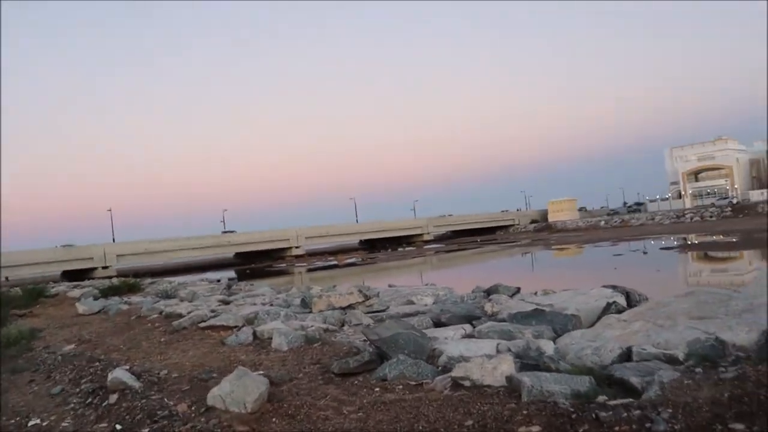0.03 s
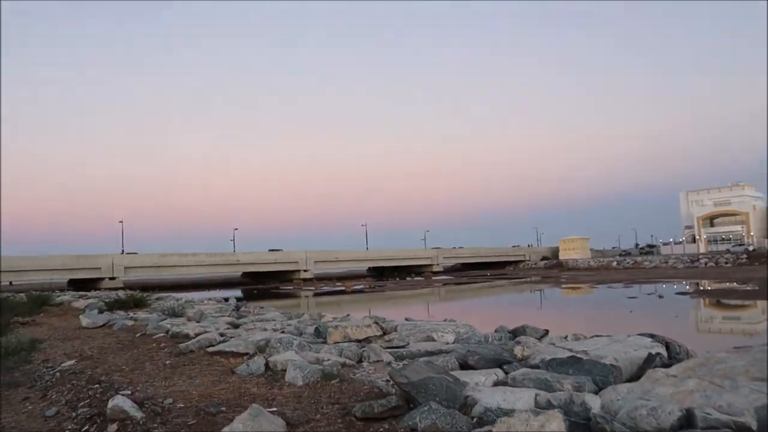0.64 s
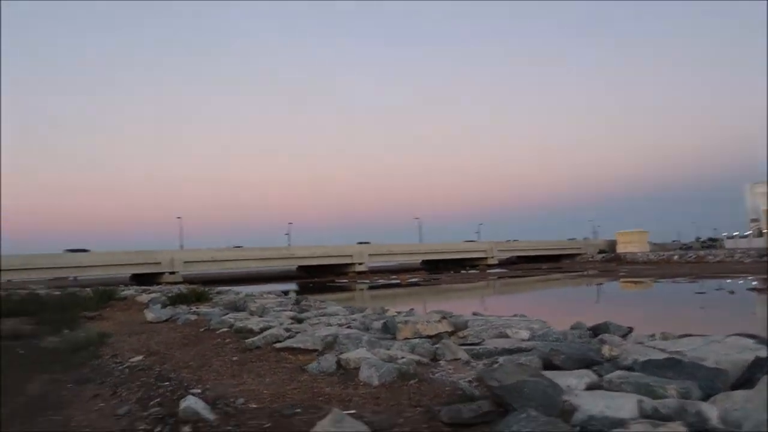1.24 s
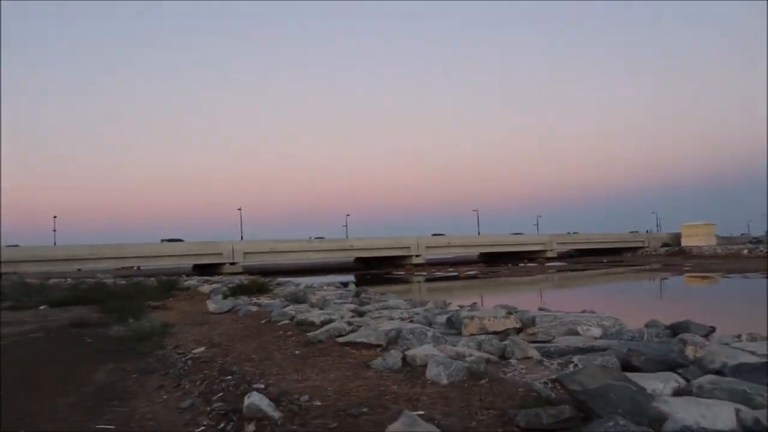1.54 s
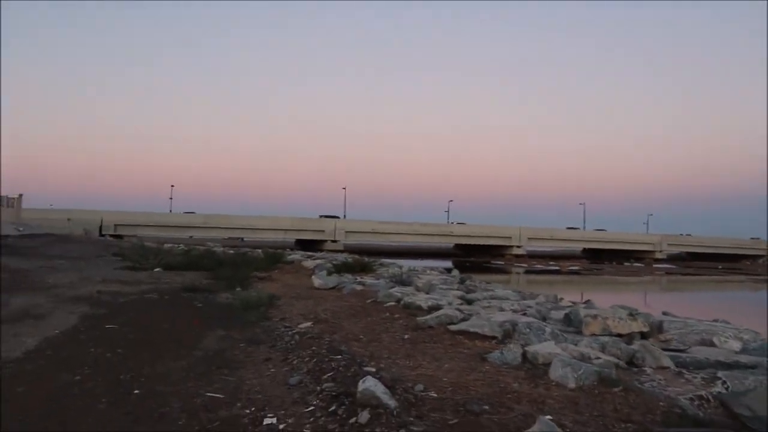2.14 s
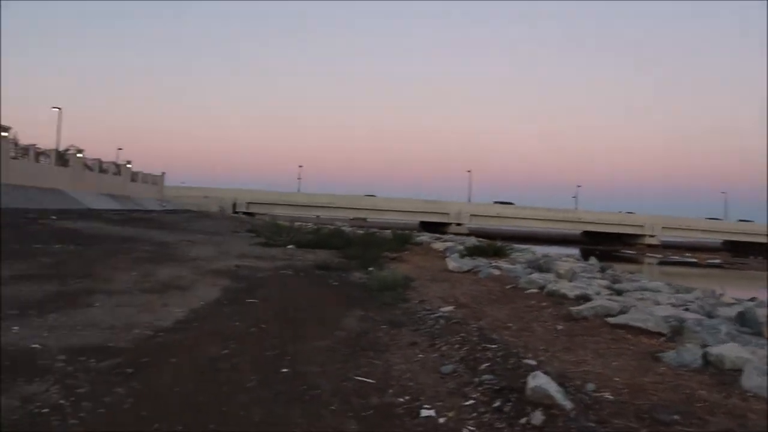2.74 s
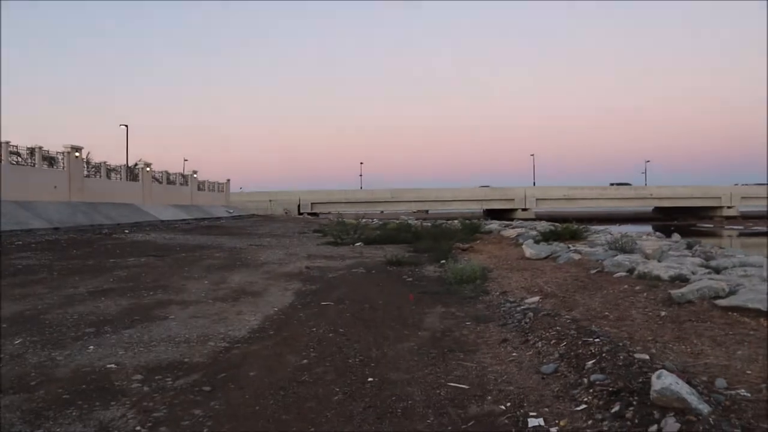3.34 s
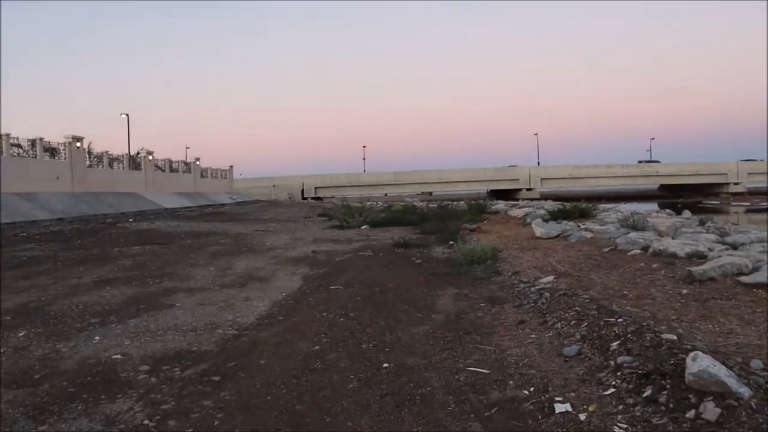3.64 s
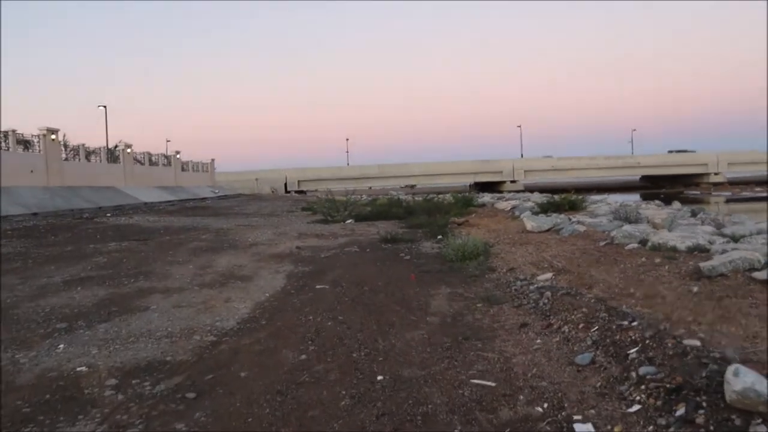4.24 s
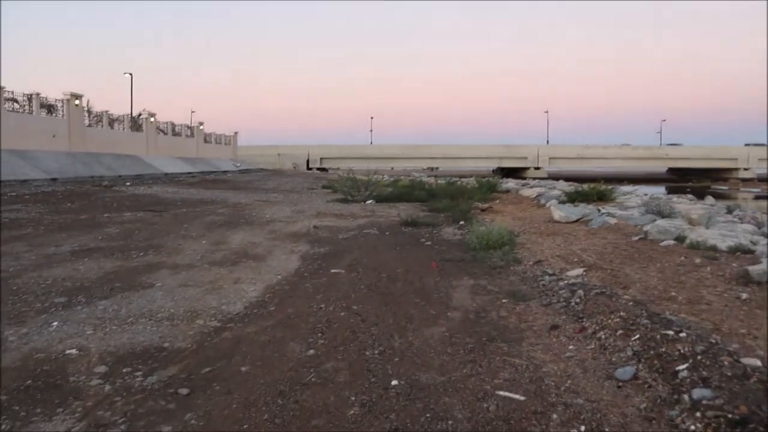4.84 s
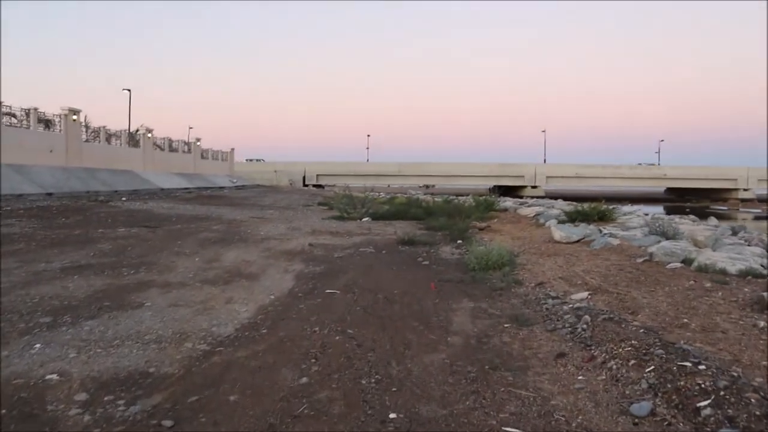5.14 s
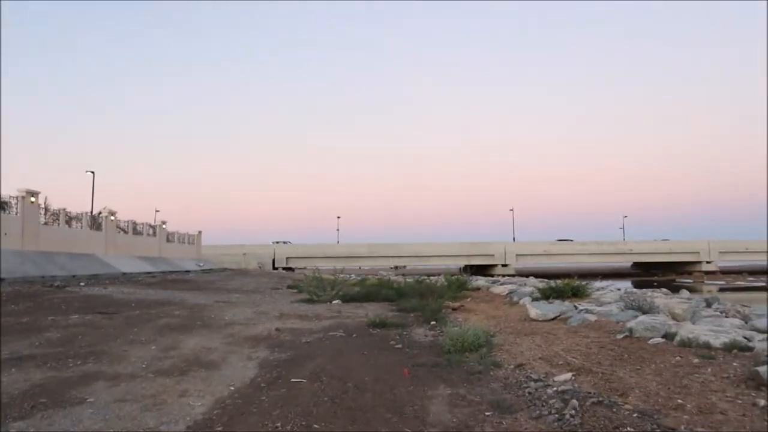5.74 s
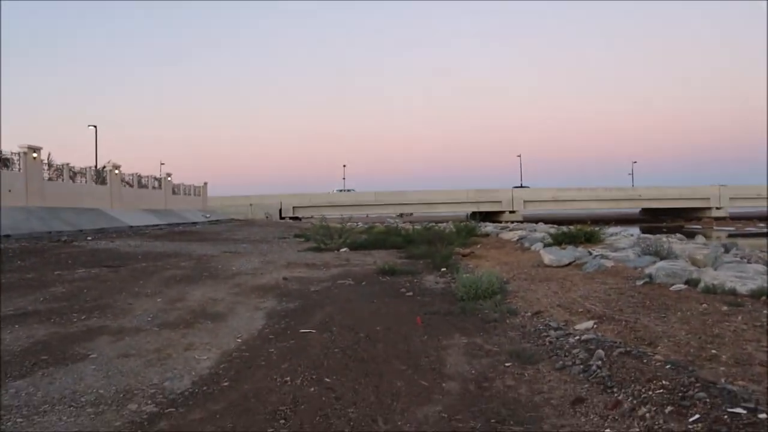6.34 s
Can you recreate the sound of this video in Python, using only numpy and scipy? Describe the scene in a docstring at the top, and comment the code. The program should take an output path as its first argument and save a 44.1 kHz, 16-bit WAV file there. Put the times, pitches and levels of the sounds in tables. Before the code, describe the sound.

Distant traffic rumbles outdoors with droning engines and one slowly accelerating, under soft footsteps on grit, faint bird chirps and a late knock.

```python
"""Far traffic rumbles on a road bridge, heard from a dirt bank below at dusk: exhausts drone, tyres roar
and one engine slowly gathers speed. A faint high twitter comes round unevenly and a far bird whistles.
Whoever carries the microphone steps and scrapes softly on grit, and a sleeve rustles as its threads rub.
Near the end something clicks against the microphone's casing and sets it ringing."""
import sys
import numpy as np
from scipy import signal
from scipy.fft import rfft, irfft
from scipy.io import wavfile

SR = 44100
rng = np.random.default_rng(int(sys.argv[2]) if len(sys.argv) > 2 else 0)


def unload_wav(signal):
    """Save mono or channel-first audio to the path in sys.argv[1] as 16-bit WAV at rate SR, clipped to [-1, 1]."""
    wavfile.write(
        sys.argv[1],
        SR,
        np.round(np.clip(np.atleast_2d(signal).T, -1, 1) * 32767).astype(np.int16),
    )


N = 291048
TIME = np.arange(N) / SR

# Sounds are pairs of rows: "mid" is what both ears share, "side" is how they differ.
# how wide the sound is at the microphone's two openings: f/Hz, side against mid/dB
STEREO_WIDTH = [(30, -41.5), (60, -71.5), (130, -26), (250, -13), (400, -7.5), (700, -5), (1000, 1),
                (1400, 3), (2400, 7), (3900, 9), (5200, 12), (8000, 7.5), (15000, 9)]


def from_db(db):
    """Turn decibels into a number to multiply by."""
    return 10 ** (np.asarray(db) / 20)


def rms_one(x):
    """Scale a signal to an average power of 1."""
    return x / np.sqrt(np.mean(x ** 2) + 1e-20)


def in_time(points):
    """Join (time, value) points with straight lines, giving a value for every sample."""
    times, values = np.transpose(points)
    return np.interp(TIME, times, values)


def at_hz(points, hz):
    """Read between (frequency, value) points, with octaves evenly spaced."""
    f, value = np.transpose(points)
    return np.interp(np.log(np.maximum(hz, 1)), np.log(f), value)


def drift(rate_hz):
    """A smooth random wander of typical size 1; a higher rate wanders faster."""
    r = np.exp(-80 * np.pi * rate_hz / SR)
    draws = rng.standard_normal(N // 40 + 2002)  # one for every 40 samples
    slow = signal.lfilter([1], [1, -2 * r, r * r], draws)[2000:]
    return np.interp(np.arange(N) / 40, np.arange(len(slow)), rms_one(slow))


def coloured(x, spectrum):
    """Give a pair its tone colour (spectrum) and stereo width; the mid comes out with power 1."""
    hz = np.arange(N // 2 + 1) * SR / N
    steep_ends = np.minimum(hz / spectrum[0][0], 1) ** 2 / np.maximum(hz / spectrum[-1][0], 1) ** 4
    mid, side = rfft(x) * from_db(at_hz(spectrum, hz)) * steep_ends
    pair = irfft(np.array([mid, side * from_db(at_hz(STEREO_WIDTH, hz))]), N)
    return pair / np.std(pair[0])


def noise(spectrum):
    """Smooth noise as a mid and side pair."""
    return coloured(rng.standard_normal((2, N)), spectrum)


def grains(spectrum, per_s, spread_db):
    """A dense patter of tiny clicks of uneven size."""
    sizes = from_db(spread_db * np.minimum(rng.exponential(1, (2, N)), 4))
    return coloured(sizes * rng.standard_normal((2, N)) * (rng.random(N) < per_s / SR), spectrum)


def ring(clicks, hz, ring_s):
    """Each click starts a pure tone that fades by 60 dB in ring_s seconds."""
    r, w = from_db(-60 / (ring_s * SR)), 2 * np.pi * hz / SR
    return signal.lfilter([0, np.sin(w)], [1, -2 * r * np.cos(w), r * r], clicks + 1e-18)


def swell(s, length):
    """A bell-shaped rise and fall: 1 at time s, about a third one length away."""
    return np.exp(-np.minimum(((TIME - s) / length) ** 2, 50))


def phase_of(hz):
    """Add up a changing pitch into the angle of a wave."""
    return 2 * np.pi * np.cumsum(hz) / SR


def blurred_tone(hz, width_hz):
    """A far tone, smeared by arriving along many paths."""
    phase = 2 * np.pi * hz * TIME
    mid, side = [drift(width_hz) * np.sin(phase) + drift(width_hz) * np.cos(phase) for _ in range(2)]
    return np.array([mid, side * from_db(at_hz(STEREO_WIDTH, hz))])


def heavy_drone():
    """A heavy engine throbs as it slows, over the steadier boom of other exhausts."""
    # how often the engine fires: t/s, f/Hz
    firing_rate = [(0, 62.34), (.7, 60.2), (1.5, 57), (2.3, 55.8), (3.3, 54.2), (4.2, 51.68), (5, 49.23),
                   (6.6, 49.55)]
    # loudness of the drone: t/s, level/dB
    drone_level = [(0, -32), (.3, -27.5), (.52, -40), (.66, -26.5), (.97, -54), (1.25, -39), (2.15, -49),
                   (2.8, -36.5), (3.2, -43.5), (4.15, -29), (4.4, -58), (4.7, -31), (5.18, -46),
                   (5.55, -30), (5.95, -39), (6.6, -39)]
    # tone colour of the boom: f/Hz, level/dB
    boom_colour = [(15, -18), (30, -2), (40, 8.5), (50, 19.5), (58, 8), (70, 1.5), (90, -24.5),
                   (130, -26.5)]
    phase = phase_of(in_time(firing_rate) * (1 + .07 * drift(8)))
    drone = np.sqrt(2) * np.sin(phase) * np.array([[1], [.02]])
    throb = from_db(in_time(drone_level) + 3.2 * drift(7))
    return throb * drone + from_db(-37) * noise(boom_colour)


def traffic():
    """Rumble and tyre roar from the bridge: the deep part surges, the rest grows a little as it nears."""
    # loudness of the deep part: t/s, level/dB
    deep_level = [(0, -32), (1.7, -30.5), (3.05, -35), (3.5, -33), (4.9, -33), (5.3, -35.5), (5.7, -31),
                  (6.3, -36), (6.6, -34)]
    # tone colour of the rumble: f/Hz, level/dB
    rumble_colour = [(45, -4.5), (70, 8.5), (100, 8.5), (135, 4), (200, 5.5), (260, -1.5), (340, -10),
                     (600, -28.5)]
    # tone colour of tyres on the road: f/Hz, level/dB
    tyre_colour = [(150, 0.5), (300, -1.5), (420, 0.5), (510, 0.5), (740, 1.5), (1100, -5), (1500, -7.5),
                   (2100, -14), (2800, -22), (4300, -30.5), (6000, -33.5), (7500, -42), (11300, -42.5),
                   (13000, -52.5), (15500, -71.5)]
    rumble = noise(rumble_colour)
    deep = signal.sosfiltfilt(signal.butter(2, 140, fs=SR, output="sos"), rumble)  # below 140 Hz
    nearing_db = 0.17 * (TIME - TIME.mean())
    tyres = from_db(-38.5 + nearing_db + 0.92 * drift(16)) * noise(tyre_colour)
    return from_db(in_time(deep_level)) * deep + from_db(-32.5 + nearing_db) * (rumble - deep) + tyres


def twitter():
    """A faint high pattern of wavering notes repeats unevenly over a shimmer; some notes ring out."""
    # blurred tones under the notes: f/Hz, width/Hz, level/dB
    shimmer = [(4820, 120, -70.5), (5400, 300, -71.5), (5720, 170, -71.5)]
    # notes of the pattern, timed from its start: t/s, f/Hz, level/dB, length/s
    pattern = [(.008, 4890, -62, .026), (.027, 5740, -66, .027), (.1, 5840, -66, .014),
               (.135, 5830, -62.5, .032), (.136, 4880, -61.3, .032), (.183, 4900, -64.5, .018),
               (.185, 5740, -68.5, .016), (.274, 5660, -62.5, .03), (.305, 4900, -62, .031),
               (.34, 5430, -64.5, .025), (.378, 5800, -66, .018)]
    # notes that carry much better: t/s, f/Hz, level/dB, length/s
    clear_notes = [(.345, 5430, -60, .025), (.555, 5830, -61, .03), (.94, 5810, -61, .03),
                   (1.32, 5800, -60, .014), (1.37, 5820, -58.5, .016), (1.505, 5680, -57, .026),
                   (1.64, 4820, -60, .028), (1.745, 4820, -58, .025), (1.875, 5820, -58.5, .015),
                   (1.93, 4860, -60, .028), (2.345, 4870, -55, .02), (2.75, 4840, -57, .03),
                   (2.85, 5760, -60, .02), (2.99, 5820, -60, .03), (3.565, 4820, -60, .025),
                   (3.805, 4820, -58.5, .036), (4.495, 4810, -60, .018), (4.625, 5790, -59, .022),
                   (5.612, 4800, -58, .015), (6.02, 5450, -56.5, .026), (6.29, 5720, -56.5, .045),
                   (6.415, 5520, -58, .02)]
    repeat_s, slip_s = .408, .009  # notes slip a little early or late
    sink_hz_per_s, waver_hz, uneven_db = 15, 68, 2.6
    wide = np.array([[1], [3.3]])
    out = sum(from_db(db) * blurred_tone(hz, width_hz) for hz, width_hz, db in shimmer)
    for s, hz, db, length in pattern:
        from_peak = (TIME + slip_s * drift(2.2) - s + repeat_s / 2) % repeat_s - repeat_s / 2
        pitch = hz - sink_hz_per_s * TIME + waver_hz * drift(110)
        note = np.exp(-(from_peak / length) ** 2) * np.sin(phase_of(pitch))
        uneven = from_db(uneven_db * np.array([drift(25), drift(25)]))
        out += from_db(db) * note * uneven * wide
    waver = phase_of(waver_hz * drift(110))
    clear = sum(from_db(db) * swell(s, length) * np.sin(2 * np.pi * hz * TIME + waver)
                for s, hz, db, length in clear_notes)
    flicker = .65 + .35 * np.array([drift(60), drift(60)])
    return out + clear * wide * flicker


def footsteps():
    """Each sole presses softly on dull soil and bright grit."""
    # steps on dirt: t/s, grit level/dB, soil level/dB, length/s
    steps = [(0.036, -64, -49, 0.07), (0.682, -61, -51, 0.035), (.76, -86, -49.5, 0.13),
             (1.38, -65, -66, 0.061), (2.191, -66, -44, 0.054), (2.865, -63.5, -50, 0.055),
             (3.56, -60.5, -58, 0.032), (3.644, -73, -45.5, 0.037), (4.178, -58, -52, 0.072),
             (4.958, -63, -45.5, 0.058), (5.544, -62, -44, 0.057), (6.137, -58, -55, 0.051),
             (6.46, -52, -45, 0.087)]
    # tone colour of grit: f/Hz, level/dB
    grit_colour = [(1000, -9), (2500, -19), (4000, 5.5), (7000, 2.5), (11500, -3), (15500, -30)]
    # tone colour of soil: f/Hz, level/dB
    soil_colour = [(150, -12), (400, 4.5), (1400, 4), (2300, -1.5), (4000, -16), (6500, -23.5),
                   (12000, -52)]
    on_grit = on_soil = 0
    for s, grit_db, soil_db, length in steps:
        weight = swell(s, length * np.where(TIME < s, 0.5, 1.3))  # builds fast, dies away more slowly
        on_grit += from_db(grit_db) * weight
        on_soil += from_db(soil_db) * weight
    grit = on_grit * grains(grit_colour, per_s=6000, spread_db=3.0)
    soil = on_soil * grains(soil_colour, per_s=1800, spread_db=2.2)
    return grit + soil


def stones():
    """Small stones snap underfoot, each a tiny burst of noise around one pitch."""
    # single snaps: t/s, peak level/dB, f/Hz
    snaps = [(0.044, -39.5, 6300), (0.059, -26, 1390), (.6175, -41, 9900), (.684, -35.5, 4500),
             (.697, -40, 4480), (0.75, -42, 4000), (0.789, -42, 1600), (1.825, -48, 4467),
             (2.169, -51, 12000), (2.906, -32, 1650), (3.503, -44, 6950), (3.537, -41.5, 5614),
             (3.649, -35, 1800), (3.78, -39, 1997), (4.249, -35, 1950), (4.478, -48, 9500),
             (4.575, -42, 9820), (4.785, -40, 3140), (4.934, -32, 1700), (4.969, -30, 1870),
             (5.246, -45, 3600), (6.087, -41, 3000), (6.338, -26.5, 6600)]
    out = np.zeros((2, N))
    t = np.arange(SR // 30) / SR
    fade = np.exp(-t / .0012) + .1 * np.exp(-t / .006)
    for s, db, hz in snaps:
        band = signal.butter(3, [hz * 0.74, min(hz * 1.24, SR / 2 - 1)], "band", fs=SR, output="sos")
        snap = signal.sosfilt(band, rng.standard_normal((2, len(t))) * fade)
        snap /= np.abs(snap).max(axis=1, keepdims=True)
        at = round(s * SR)
        out[:, at:at + len(t)] += from_db(db) * snap * [[1], [1.3]]
    return out


def other_engines():
    """Other engines rise out of the rumble as unsteady low hums and sink back."""
    # brief hums: t/s, f/Hz, level/dB, length/s
    hums = [(0.578, 105, -33.5, 0.18), (1.197, 80.7, -39, 0.42), (2.151, 83, -42, 0.34),
            (3.05, 102.1, -35, 0.23), (4.204, 89.7, -41, 0.32), (4.995, 112, -33.5, 0.2),
            (5.908, 99, -34, 0.38)]
    out = 0
    for s, hz, db, length in hums:
        phase = phase_of(hz * (1 + 0.0266 * drift(8)))
        out += from_db(db) * swell(s, length) * np.sqrt(2) * np.sin(phase)
    return out * np.array([[1], [.03]])


def scrapes():
    """Gravel grinds under a sliding sole, and one heel lands with a dull thud."""
    # slides of a sole: t/s, level/dB, length/s
    slides = [(0.688, -55, .016), (0.754, -58, 0.013), (3.547, -60, 0.038), (3.645, -52.5, .022),
              (4.79, -48, .01), (4.97, -64, .02), (5.195, -53, 0.049), (6.086, -54, 0.014),
              (6.145, -59, .02), (6.453, -46.5, 0.028), (6.511, -54, .025)]
    # tone colour of scraped gravel: f/Hz, level/dB
    gravel_colour = [(1000, -7.5), (1800, 5), (2700, -3.5), (3800, 1), (5000, -6.5), (8000, -18),
                     (13000, -25)]
    # tone colour of the thud in the ground: f/Hz, level/dB
    thud_colour = [(220, -4), (330, 6), (480, -1), (800, -10)]
    grind = sum(from_db(db) * swell(s, length) for s, db, length in slides)
    gravel = grains(gravel_colour, per_s=1500, spread_db=2.0) * [[1], [.65]]
    heel = from_db(-31.5) * swell(6.445, length=0.024) * noise(thud_colour)
    return grind * gravel + heel


def speeding_engine():
    """An exhaust hums at multiples of a rising engine speed; distance leaves low tones and a dull rasp."""
    # engine cycles per second: t/s, f/Hz
    speed = [(.9, 33.4), (1.55, 37.38), (2.3, 40.21), (3.0, 43.96), (3.6, 44.62), (4.2, 45.4), (5.1, 45.87),
             (5.7, 48.34), (6.6, 49.3)]
    # tone at 4 times that rate, swelling and fading on its way over the ground: t/s, level/dB
    fourth_level = [(.9, -36), (1.15, -38), (1.9, -34.5), (2.17, -28.5), (2.82, -41), (3.0, -34),
                    (3.5, -24), (3.85, -38), (4.7, -31.5), (4.95, -37.5), (5.68, -26), (5.88, -33.5),
                    (6.1, -20.5), (6.33, -28.5), (6.6, -20.5)]
    # tone at 5 times that rate: t/s, level/dB
    fifth_level = [(.9, -53), (1.5, -34.5), (2.05, -32.5), (2.35, -24.5), (2.7, -32), (2.98, -35),
                   (3.33, -27.5), (3.9, -41.5), (4.25, -29), (4.65, -37), (5.4, -41), (5.72, -47),
                   (6.05, -41), (6.6, -32)]
    # weaker tones: multiple of the rate, level against the two strong tones/dB
    weak_tones = [(2, -22), (3, -27), (6, -31), (7, -31.5), (9, -30.5)]
    # the rasp opens up as the engine nears: t/s, level/dB
    rasp_level = [(4.0, -82), (5.4, -42.5), (5.9, -40.5), (6.6, -47.5)]
    # tone colour of the rasp: f/Hz, level/dB
    rasp_colour = [(230, 6.5), (320, 6), (430, -3.5), (520, -20.5), (900, -27.5)]
    flutter_db, flutter_hz = 1.5, 3.5  # moving air makes the strong tones flutter
    fourth, fifth = from_db(in_time(fourth_level)), from_db(in_time(fifth_level))
    phase = phase_of(in_time(speed) * (1 + 0.0047 * drift(12.4)))
    hum = fourth * from_db(flutter_db * drift(flutter_hz)) * np.sin(4 * phase)
    hum += fifth * from_db(flutter_db * drift(flutter_hz)) * np.sin(5 * phase)
    for multiple, db in weak_tones:
        gain = np.hypot(fourth, fifth) * from_db(db + 3.4 * drift(4.9))
        hum += gain * np.sin(round(multiple) * phase + rng.uniform(0, 2 * np.pi))
    hum *= 1 + .12 * drift(26)  # the exhaust is a little rough
    fade_in = np.clip((TIME - .8) / 0.36, 0, 1)
    rasp = from_db(in_time(rasp_level)) * noise(rasp_colour)
    return np.sqrt(2) * hum * fade_in * np.array([[1], [.03]]) + rasp


def bird_calls():
    """A far bird gives thin whistles that arch in pitch and scatter a little on the way."""
    # calls: t/s, f/Hz, glide/(Hz per s), level/dB, length/s
    calls = [(1.11, 3540, 500, -59.5, .042), (2.01, 3400, -200, -63.5, .07), (2.62, 3530, -600, -60, .048),
             (2.96, 3590, -400, -56.3, .04), (3.075, 3770, -3200, -56, .028)]
    # close whistles that make up a call: distance from its pitch/Hz, level/dB
    whistles = [(0, 0), (-160, -2.5), (-320, -10), (160, -12)]
    arch_hz = 70  # the pitch bends down this far, one length from the middle
    out = 0
    for s, hz, glide, db, length in calls:
        from_peak = np.clip(TIME - s, -2 * length, 2 * length)
        pitch = hz + glide * from_peak - arch_hz * (from_peak / length) ** 2
        phase = phase_of(pitch * (1 + .004 * drift(60)))
        direct = sum(from_db(whistle_db) * np.sin(phase + 2 * np.pi * apart_hz * TIME)
                     for apart_hz, whistle_db in whistles)
        scattered = .25 * blurred_tone(hz - arch_hz, width_hz=95)
        out += from_db(db) * swell(s, length) * (direct * np.array([[.8], [1.5]]) + scattered)
    return out


def far_whines():
    """Thin, blurred whines come briefly from the traffic."""
    # whines: t/s, f/Hz, level/dB, length/s
    whines = [(2.22, 1325, -49.5, 0.27), (5.883, 440, -45.5, 0.069)]
    return sum(from_db(db) * swell(s, length) * blurred_tone(hz, width_hz=12)
               for s, hz, db, length in whines)


def sleeve():
    """Threads slip over each other in a fine bright hiss that builds up, catches and lets go."""
    # rubs of the sleeve: t/s, level/dB, rise/s
    rubs = [(4.55, -58.5, 0.062), (4.68, -51.5, 0.051), (4.77, -55, 0.056), (4.9, -56.5, 0.04),
            (4.985, -55, 0.036), (5.07, -57, 0.033), (5.191, -48.5, 0.058), (5.411, -60, 0.13),
            (5.549, -55.5, 0.1), (5.703, -53, 0.028), (5.84, -56.5, 0.11), (5.95, -59.5, 0.037),
            (6.16, -70, 0.053), (6.505, -49, 0.054)]
    # tone colour of rubbing cloth: f/Hz, level/dB
    cloth_colour = [(800, -21), (2000, 1), (2900, 2.5), (3900, 4.5), (5000, 1), (6000, -3.5), (8000, -6),
                    (10500, 0), (12300, -0.5), (14000, -13), (15500, -17)]
    pressure = sum(from_db(db) * swell(s, np.where(TIME < s, rise, rise * 0.65)) for s, db, rise in rubs)
    hiss = grains(cloth_colour, per_s=5500, spread_db=1.5) * [[1], [1.15]]
    catching = from_db(1.5 * drift(29))
    return pressure * catching * hiss


def casing_knock():
    """A knock and its bounces ring the casing, which shakes the microphone's two openings unequally."""
    # the knock and its bounces: t/s, level/dB
    knocks = [(6.433, -16), (6.447, -19.5), (6.4589, -20), (6.467, -25), (6.476, -27)]
    # tones the casing rings at: f/Hz, level/dB, time to fade by 60 dB/s
    casing_tones = [(320, -11, 0.0613), (384, -9, .06), (764, -4, 0.02), (1150, -14, 0.018),
                    (2382, -14, 0.0059)]
    # tone colour of the crack of each hit: f/Hz, level/dB
    crack_colour = [(800, 11.5), (2500, -10), (5200, 0.5), (7000, -10), (10800, 0.5), (12500, -11),
                    (15000, -19)]
    ringing = np.zeros(N)
    at = [round(s * SR) for s, db in knocks]
    for hz, db, ring_s in casing_tones:
        hit_db = np.array(knocks)[:, 1] + db + rng.standard_normal(len(at))
        clicks = np.zeros(N)
        clicks[at] = from_db(hit_db) * rng.choice([-1, 1], len(at))
        ringing += ring(clicks, hz, ring_s)
    contact = sum(from_db(db - 12) * swell(s + .0006, .0011) for s, db in knocks)
    return ringing * np.array([[.45], [.55]]) + contact * noise(crack_colour)


def scene():
    """Add up the sounds and turn mid and side into left and right; the small sounds lean left."""
    road = heavy_drone() + traffic() + far_whines() + other_engines() + speeding_engine()
    small = twitter() + bird_calls() + footsteps() + stones() + scrapes() + sleeve() + casing_knock()
    to_ears = np.array([[1, 0.69], [1, -0.81]])
    return to_ears @ road + from_db([[1.2], [-1.2]]) * (to_ears @ small)


def record(dry):
    """Cut away the highest treble steeply."""
    cutoff_hz = 15600
    return signal.sosfilt(signal.ellip(10, .1, 90, cutoff_hz, fs=SR, output="sos"), dry)


dry = scene()
out = record(dry)
unload_wav(out)
```